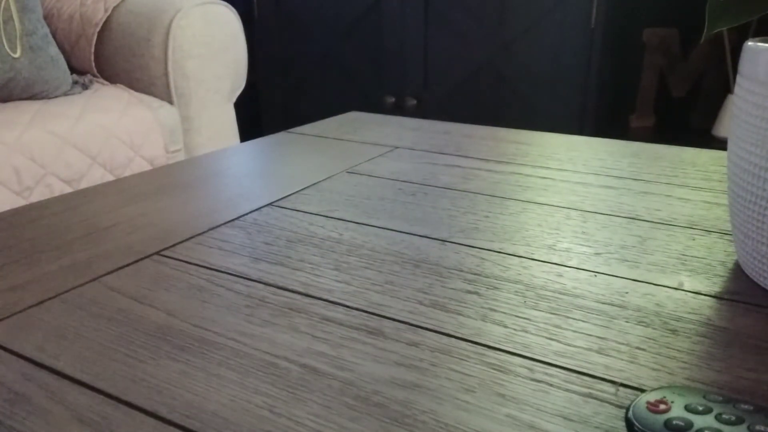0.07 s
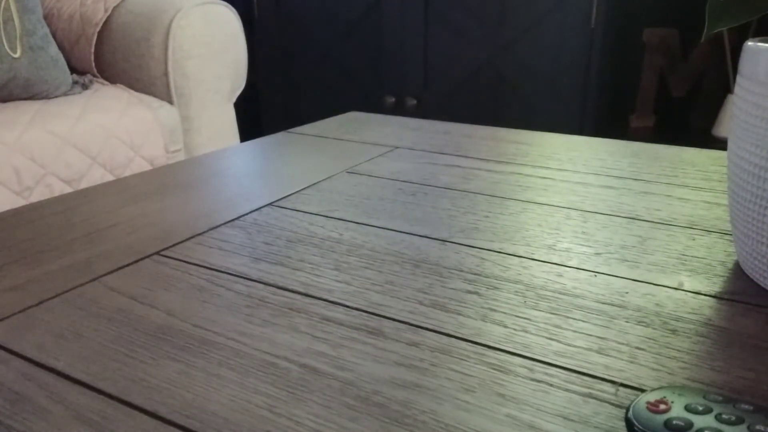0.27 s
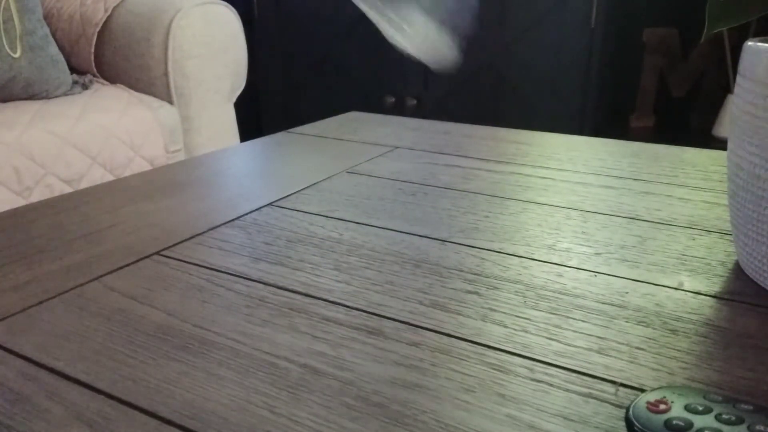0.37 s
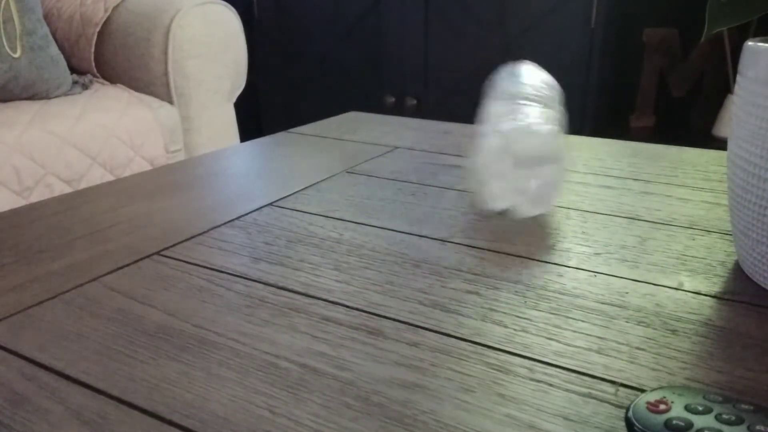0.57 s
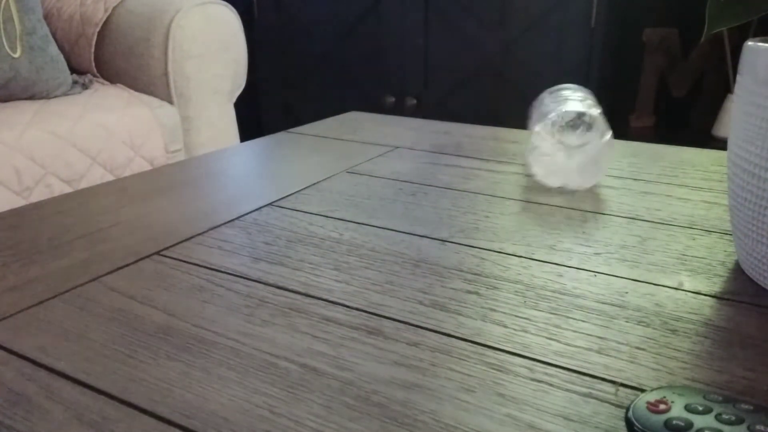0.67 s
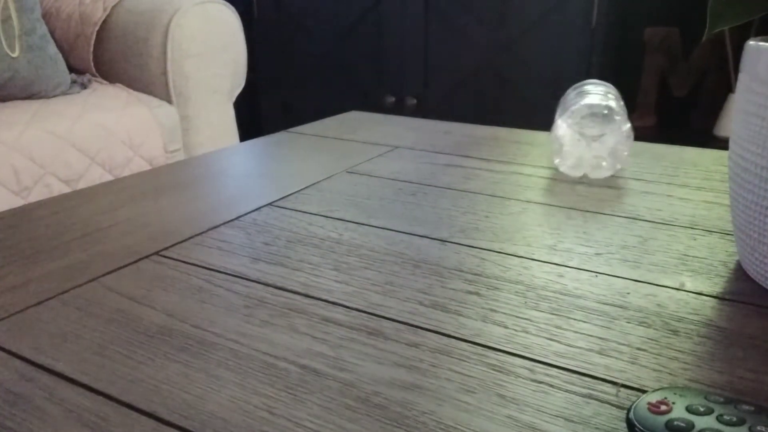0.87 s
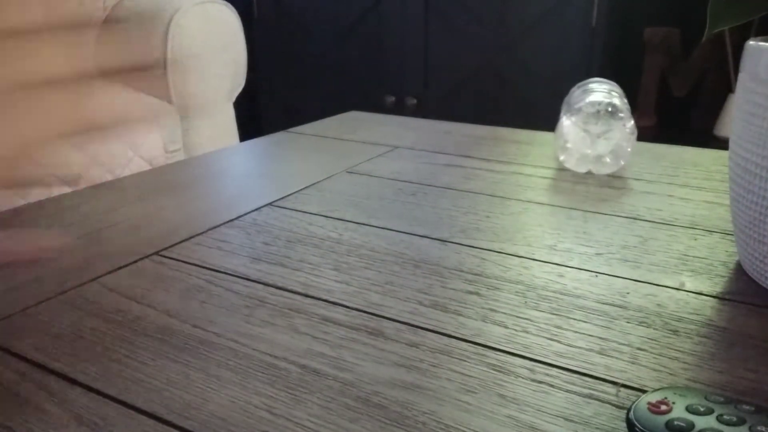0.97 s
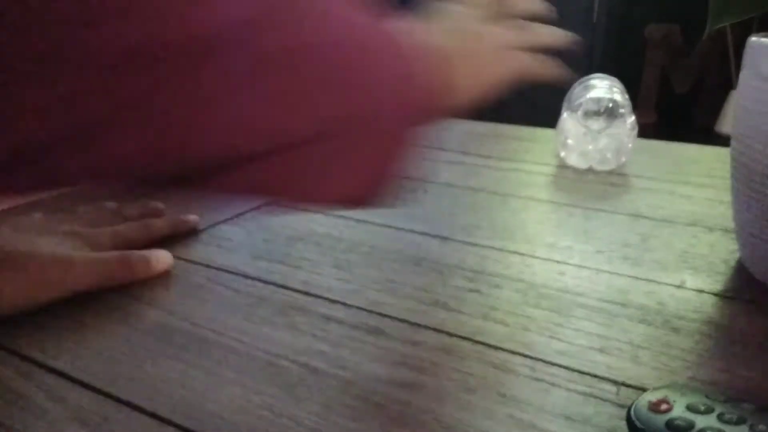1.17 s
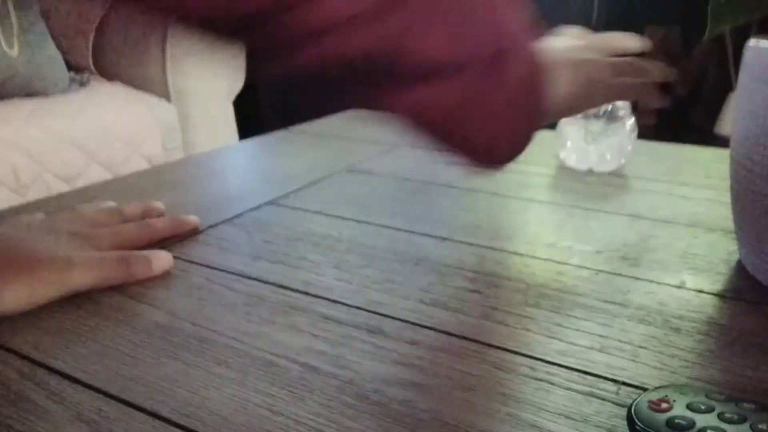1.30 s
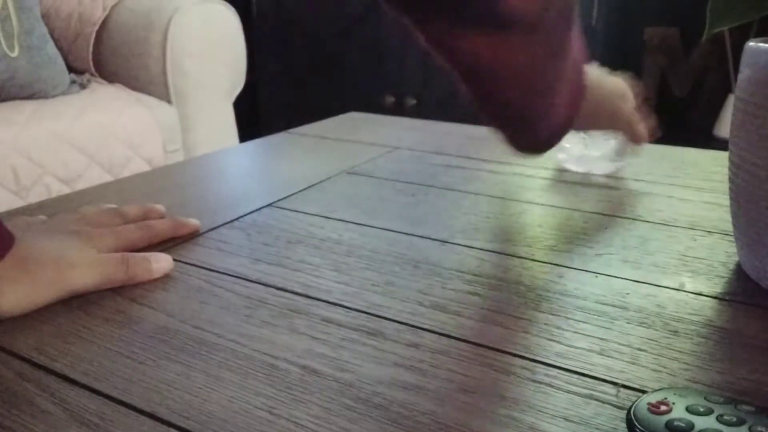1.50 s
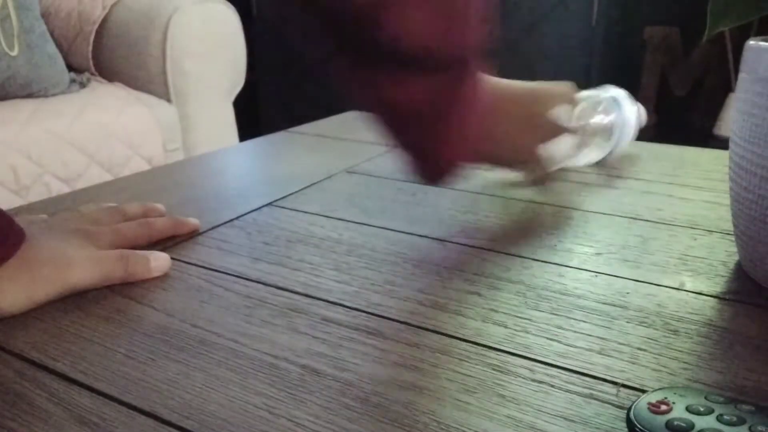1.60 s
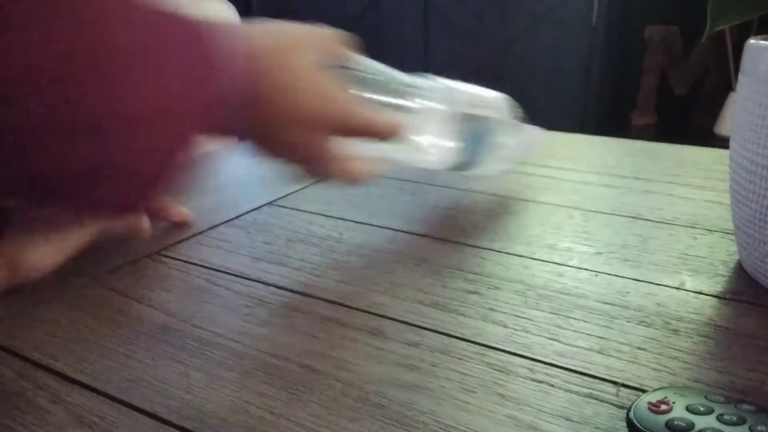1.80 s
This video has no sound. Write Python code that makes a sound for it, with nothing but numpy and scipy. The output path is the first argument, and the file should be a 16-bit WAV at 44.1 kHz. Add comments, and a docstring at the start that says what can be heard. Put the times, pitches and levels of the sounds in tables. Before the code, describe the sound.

A tossed plastic bottle hits a wooden table with a sharp crack, then lands with a booming knock. Small plastic ticks follow, a sleeve brushes the wood and the bottle is picked up, close by in a small room.

```python
"""Plastic bottle landing on a table

In a small living room, a tossed bottle cracks against a wooden table as its thin wall buckles, bounces
and lands on its base; the top booms. It settles with small ticks, a sleeve brushes over the wood and
fingers pick the bottle up. The microphone is close, and the first blow overloads it."""
import sys
import numpy as np
from scipy import signal
from scipy.io import wavfile

SR = 44100
rng = np.random.default_rng(int(sys.argv[2]) if len(sys.argv) > 2 else 0)


def unload_audio(sound):
    """Save the sound as a 16-bit wav file, at the path given as the first command line argument."""
    columns = np.transpose(np.atleast_2d(sound))
    # keep every value between -1 and 1, then stretch to whole-number steps
    steps = np.round(np.clip(columns, -1, 1) * 32767)
    wavfile.write(sys.argv[1], SR, steps.astype(np.int16))


N = 81585
TIME = np.arange(N) / SR


def amp(db):
    """Decibels to gain."""
    return 10 ** (np.asarray(db) / 20)


def unit(x):
    """Scales to rms 1."""
    return x / np.sqrt(np.mean(x ** 2) + 1e-20)


def read(points, hz):
    """Reads a table over log frequency."""
    f, value = np.transpose(points)
    return np.interp(np.log(hz + 1), np.log(f + 1), value)


def level(points, column=1):
    """Gain over time from a dB curve, silent outside it."""
    rows = np.array(points)
    return amp(np.interp(TIME, rows[:, 0], rows[:, column], left=-140, right=-140))


def add(mix, s, sound):
    """Mixes a sound in, starting at s seconds."""
    part = mix[max(round(s * SR), 0):][:len(sound)]
    part += sound[:len(part)]


def colour(x, points):
    """Minimum-phase filter of unit energy. Each row of points: frequency in Hz, relative level in dB."""
    hz = abs(np.fft.fftfreq(4096, 1 / SR))
    log_gain = np.log(amp(read(points, hz)))
    spectrum = np.exp(np.conj(signal.hilbert(log_gain)))
    taps = np.fft.ifft(spectrum).real[:2048]
    return signal.fftconvolve(x, taps / np.linalg.norm(taps))[:len(x)]


def burst(decay_s):
    """A short dying spray of tiny fractures."""
    t = TIME[:SR // 10]
    return rng.choice([-1., 1.], len(t)) * np.exp(-t / decay_s)


def ring(modes):
    """Tones dying away; neighbours swing in opposite directions."""
    return sum((-1) ** k * amp(db - 60 * TIME / t60) * np.sin(2 * np.pi * hz * TIME)
               for k, (hz, db, t60) in enumerate(modes))


def friction(catches_per_s=2500, spread_db=3, smooth_share=0.73):
    """Dense random catches of uneven size over a smooth hiss."""
    size = amp(spread_db * np.minimum(rng.exponential(1, N), 4))
    catches = size * rng.choice([-1., 1.], N) * (rng.random(N) < catches_per_s / SR)
    return unit(unit(catches) + smooth_share * rng.standard_normal(N))


def room(x, delay_s=0.0022, late_db=-28, late_stretch=2.4):
    """The living room: dense reflections, each band dying at its own speed, over a faint slower tail."""
    # Each row: frequency in Hz, seconds to fall 60 dB.
    decay_times = [(110, .4), (250, .22), (500, .3), (1000, .26), (2500, .24), (3500, .3), (4700, .22),
                   (6500, .29), (10000, .24), (16000, .23)]
    hz, t, bands = signal.stft(rng.standard_normal(SR), SR, nperseg=256)
    fall_db = -60 * t / read(decay_times, hz)[:, None]
    decay = np.hypot(amp(fall_db), amp(late_db + fall_db / late_stretch))
    tail = signal.istft(bands * decay, SR, nperseg=256)[1]
    tail *= np.clip(TIME[:len(tail)] / delay_s - 1, 0, 1)  # reflections fade in after the delay
    return signal.fftconvolve(x, tail / np.linalg.norm(tail))[:N]


def background(floor_db=-72):
    """Steady faint hiss, a low rumble swelling after each movement and a hollow hum after the bounce."""
    # Each row: frequency in Hz, relative level in dB.
    floor_colour = [(18, -47), (30, -17), (90, 1), (160, -11), (404, -22), (1070, -24), (1960, -27),
                    (3140, -19), (3980, -7), (4420, -13), (6550, -7), (8740, -22), (16000, -35)]
    rumble_colour = [(25, -30), (60, -5), (88, 0), (115, -6), (170, -19), (280, -32), (12000, -95)]
    hollow_colour = [(100, -25), (280, -16), (400, -3), (500, 0), (680, -4), (900, -18), (3000, -35),
                     (12000, -65)]
    # Each row: time in seconds, level in dB.
    rumble_levels = [(.38, -75), (.43, -45), (.52, -51), (.62, -62), (.72, -74), (.78, -59), (.87, -62),
                     (1.15, -70), (1.35, -80), (1.72, -73), (1.85, -80)]
    hollow_levels = [(.39, -61), (.43, -40), (.475, -54.5), (.51, -53.5), (.6, -67), (.72, -71), (.86, -70)]
    hiss = amp(floor_db) * unit(colour(rng.standard_normal(N), floor_colour))
    rumble = level(rumble_levels) * unit(colour(rng.standard_normal(N), rumble_colour))
    hollow = level(hollow_levels) * unit(colour(rng.standard_normal(N), hollow_colour))
    return hiss + rumble + hollow


def sleeve_tone(waver_hz=30, waver_depth=0.3):
    """The sleeve sticks and slips at a nearly steady rate: a narrow, wavering tone."""
    # Each row: time in seconds, pitch in Hz, level in dB.
    glide = [(1.29, 415, -56), (1.345, 432, -47), (1.39, 428, -43), (1.43, 435, -58), (1.465, 482, -50),
             (1.515, 488, -53), (1.56, 470, -72)]
    s, hz, _ = np.transpose(glide)
    carrier = np.exp(2j * np.pi * np.cumsum(np.interp(TIME, s, hz)) / SR)
    noise = rng.standard_normal(N) + 1j * rng.standard_normal(N)
    waver = signal.sosfilt(signal.butter(2, waver_hz, fs=SR, output="sos"), noise)
    tone = (carrier * (1 + waver_depth * waver / np.std(waver))).real
    return level(glide, column=2) * unit(tone)


def sleeve_brush():
    """A sleeve hisses across the table and makes the wood hum."""
    # Each row: time in seconds, the wood's hum in dB, the cloth's hiss in dB.
    stroke = [(1.245, -85, -75.5), (1.268, -48, -50.5), (1.315, -45, -52), (1.35, -36, -40),
              (1.395, -43, -43), (1.425, -51, -48.5), (1.49, -53.5, -51), (1.53, -72, -66.5),
              (1.58, -86, -52), (1.64, -80.5, -74)]
    # Each row: frequency in Hz, relative level in dB.
    wood_colour = [(80, -25), (190, -11), (280, -15.5), (400, 0.5), (570, -5), (720, 0), (950, -13),
                   (2000, -15), (5000, -57)]
    cloth_colour = [(300, -8.5), (1300, 5), (2000, -1.5), (2450, -3), (3300, 11), (4600, 0.5), (5500, 6.5),
                    (7400, 2), (8300, -12.5), (11000, -30.5), (13000, -14), (16000, -24.5)]
    hum = colour(friction() * level(stroke), wood_colour) + sleeve_tone()
    hiss = colour(friction() * level(stroke, column=2), cloth_colour)
    return hum + hiss


def base_scuff():
    """The base scuffs briefly on the wood as it comes to rest."""
    # Each row: time in seconds, level in dB.
    scuff_levels = [(1.02, -91), (1.049, -44.5), (1.07, -48), (1.095, -102)]
    # Each row: frequency in Hz, relative level in dB.
    scuff_colour = [(300, -9), (1100, -21), (1550, 4.5), (2400, -5.5), (3300, 5.5), (4500, -13), (7000, -6),
                    (11000, -37)]
    return level(scuff_levels) * colour(friction(), scuff_colour)


def lift_bump(start_s=1.832):
    """The bottle bumps the wood as it is lifted, and its body rings hollow."""
    # Each row: frequency in Hz, level in dB, seconds to fall 60 dB.
    body_modes = [(400, -43, .06), (900, -48, .035), (1490, -53, .035), (2300, -50, .025)]
    out = np.zeros(N)
    add(out, start_s, ring(body_modes))
    return out


def plastic_ticks(skirt_db=-30, treble_hz=8500):
    """Small patches of plastic flex, each around its own pitch, with little treble far above it."""
    # Each row: start in seconds, level in dB, centre in Hz, width in octaves, decay in seconds.
    ticks = [(.399, -35, 4500, 1.2, .006), (.432, -43, 5500, 1.1, .004), (.965, -22, 5600, .35, .001),
             (.9802, -26, 5800, .5, .001), (.998, -35, 7800, .35, .001), (1.2538, -50, 4500, 1.3, .005),
             (1.394, -32, 2400, .9, .003), (1.4262, -33.5, 3600, .3, .002), (1.503, -34, 5100, .3, .002),
             (1.5358, -44, 1500, 1.4, .003), (1.547, -46, 4500, 1, .002), (1.569, -42.5, 2900, .7, .002),
             (1.607, -53, 1800, 1.2, .007), (1.62, -42, 13200, .15, .0015), (1.6985, -56, 2300, .9, .008),
             (1.832, -55, 5000, 1, .009)]
    out, hz = np.zeros(N), np.geomspace(50, 20000, 80)
    for s, db, centre_hz, octaves, decay_s in ticks:
        hump = np.exp(-.5 * (np.log2(hz / centre_hz) / octaves) ** 2) + amp(skirt_db)
        hump /= np.hypot(1, (hz / max(treble_hz, centre_hz)) ** 4)
        tick_colour = np.c_[hz, 20 * np.log10(hump)]
        add(out, s, amp(db) * colour(burst(decay_s), tick_colour))
    return out


def table_boom(bass_hz=140, swell_cycles=1):
    """Heavy knocks reach the table top's deepest modes; soft ones miss the high modes."""
    # Each row: start in seconds, level in dB, bass weight in dB, softness corner in Hz, ring time share.
    knocks = [(0.243, -17, -9.5, 2500, 0.91), (0.401, -22, -8, 800, 0.33), (.423, -51, -9, 900, 0.4),
              (0.444, -47, 1, 1500, 0.69), (0.8804, -17, 6.5, 2022, 0.75), (1.269, -42.5, 19.5, 447, 0.29),
              (1.701, -55.5, 13.5, 300, 0.46), (1.832, -48, 3, 603, 0.72)]
    # Each row: frequency in Hz, relative level in dB, seconds to fall 60 dB at a ring time share of 1.
    table_modes = [(55.3, -11, 0.54), (86.06, -8, .2), (122, -14.5, 0.12), (184, -4.5, 0.14),
                   (213, -8.5, 0.33), (256.6, -2, 0.1), (421, -2.5, 0.086), (464, -12.5, 0.24),
                   (605, -14.5, 0.044), (654, -4.5, 0.096), (790, -7, 0.041), (968, -6.5, .04),
                   (1264, -2.5, 0.014)]
    out = np.zeros(N)
    for s, db, weight_db, soft_hz, ring_share in knocks:
        for k, (hz, mode_db, t60) in enumerate(table_modes):
            gain = amp(db + weight_db * (hz < bass_hz)) / np.hypot(1, hz / soft_hz)
            swell = 1 - np.exp(-TIME * hz / swell_cycles)  # the top takes a moment to get moving
            mode = ring([(hz, mode_db, t60 * ring_share)])
            add(out, s, (-1) ** k * gain * swell * mode)
    return out


def base_landing(crack_db=-6.5, crack_s=0.0012, room_db=-4):
    """The stiff base's feet touch down in turn; returns their dry ring and their crack in the room."""
    # Each row: start in seconds, relative level in dB.
    touchdowns = [(0.871, -26), (0.8745, -29), (0.8786, 0), (0.881, -19.5), (0.8932, -18.5)]
    # Each row: frequency in Hz, relative level in dB, seconds to fall 60 dB.
    base_modes = [(850, -12, .024), (1130, -11, .021), (1570, -13, .028), (2350, -12, .006),
                  (3350, -5, .014), (3640, -4.5, .013), (4100, -16, .015), (5600, -16, .01),
                  (7500, -14, .005)]
    # Each row: frequency in Hz, relative level in dB.
    crack_colour = [(100, 7.5), (1000, -2.5), (1650, -3), (2600, -6.5), (3500, -5.5), (4700, -4.5),
                    (5700, -8.5), (7500, -6.5), (10000, -19.5), (16000, -22)]
    rings, cracks = np.zeros((2, N))
    base_ring = ring(base_modes)
    for s, db in touchdowns:
        crack = amp(db + crack_db) * burst(crack_s)
        reflections = np.linalg.norm(crack) * room(np.ones(1))
        add(rings, s, amp(db) * base_ring)
        add(cracks, s, crack)
        add(cracks, s, amp(room_db) * reflections)
    return rings, colour(cracks, crack_colour)


def first_blow(snap_s=0.0015, tones_db=-24, room_db=-7):
    """The thin wall buckles in a run of snaps, coloured by a few brief ringing tones."""
    # Each row: start in seconds, level in dB.
    buckles = [(0.241, -12), (0.2447, -2), (.245, 4), (0.2465, -4), (0.2483, 1.5), (.251, -6.5),
               (0.254, -1.5), (0.2565, -0.5), (0.258, -3), (0.2751, -18.5)]
    # Each row: frequency in Hz, relative level in dB.
    snap_colour = [(60, -27.5), (120, -10.5), (200, -3), (330, -4.5), (470, -5.5), (700, -1.5),
                   (1000, -5.5), (1900, -2.5), (3300, -1.5), (4600, -3.5), (5700, -0.5), (7200, -1.5),
                   (9000, -9), (10500, -18.5), (16000, -22)]
    # Each row: frequency in Hz, relative level in dB, seconds to fall 60 dB.
    snap_tones = [(1040, -8, .06), (1230, -5, .06), (1530, 0, .1), (1816, -5, .1), (2379, -1, .08),
                  (2630, 1, .08), (3900, -1, .07), (4673, -2, .08), (5520, 4, .1), (6050, -1, .08),
                  (6775, 1, .1), (6881, 1, .1)]
    snaps = np.zeros(N)
    for s, db in buckles:
        snap = amp(db) * burst(snap_s)
        add(snaps, s, snap)
        add(snaps, s, amp(room_db) * room(snap))  # each snap takes its own way into the room
    out = colour(snaps, snap_colour)
    add(out, buckles[0][0], amp(tones_db) * ring(snap_tones))
    return out


def scene(knock_room_db=-14, tick_room_db=-13, base_room_db=-18, rub_room_db=-16):
    """Bottle, table and sleeve from close by, in mono, with the room behind them."""
    rings, cracks = base_landing()
    knocks = table_boom() + lift_bump()
    sources = np.array([knocks, plastic_ticks(), rings, base_scuff() + sleeve_brush()])
    sends = amp([knock_room_db, tick_room_db, base_room_db, rub_room_db])
    return (first_blow() + cracks + sources.sum(0) + room(sends @ sources) + background())[None]


def record(dry, ceiling=0.8, low_cut_hz=57, high_cut_hz=16300):
    """The close microphone overloads with a firm knee; the deepest bass and highest treble are cut."""
    clipped = dry / (1 + (dry / ceiling) ** 4) ** (1 / 4)
    low_cut = signal.butter(3, low_cut_hz, "high", fs=SR, output="sos")
    high_cut = signal.firwin(511, high_cut_hz, window=("kaiser", 9), fs=SR)
    return signal.oaconvolve(signal.sosfilt(low_cut, clipped), high_cut[None], "same")


dry = scene()
out = record(dry)
unload_audio(out)
```